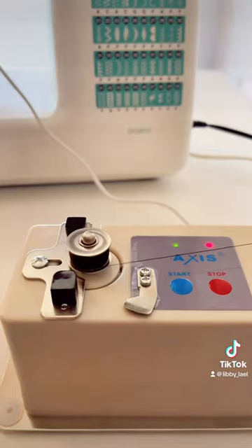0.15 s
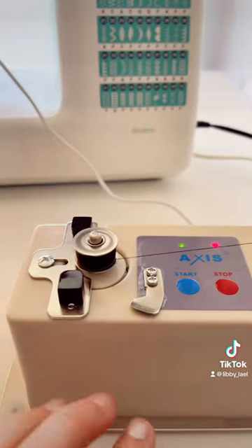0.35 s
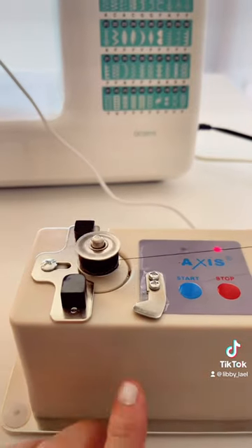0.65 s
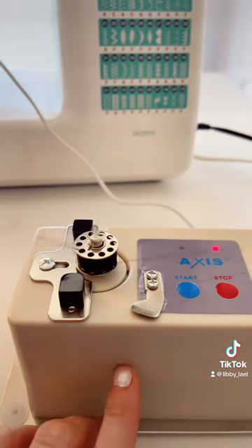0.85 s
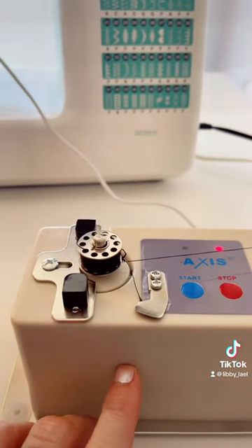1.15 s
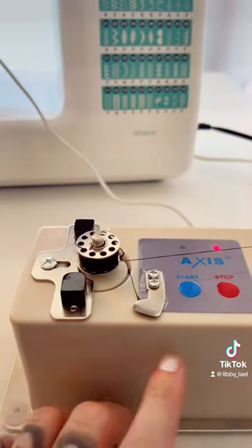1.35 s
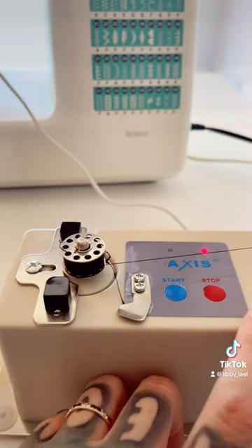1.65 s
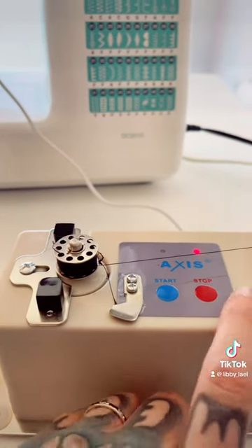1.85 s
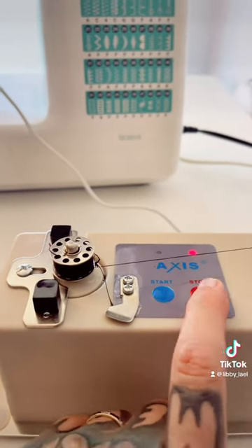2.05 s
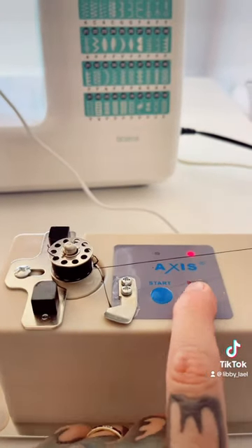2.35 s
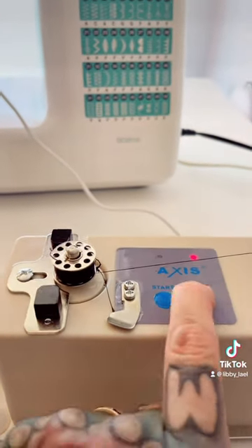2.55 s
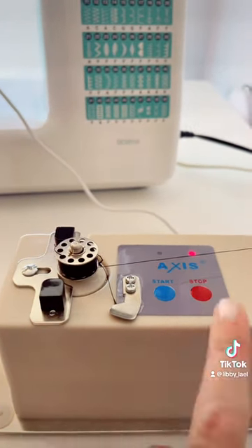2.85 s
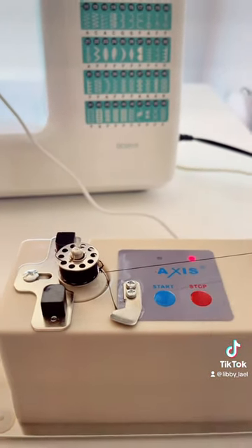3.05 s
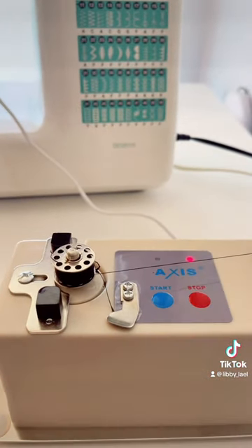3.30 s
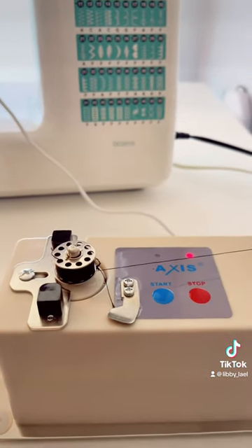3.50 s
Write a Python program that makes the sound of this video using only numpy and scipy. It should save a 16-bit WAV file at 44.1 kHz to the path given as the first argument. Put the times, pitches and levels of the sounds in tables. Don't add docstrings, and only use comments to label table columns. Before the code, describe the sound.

A small motor whirs grittily, spinning a rattling metal bobbin in a plastic box, then squeals and runs down within a second; soft hand brushing and sharp button clicks follow, close microphone in a small humming room.

```python
import sys
import numpy as np
from scipy import signal
from scipy.fft import rfft, irfft, next_fast_len
from scipy.io import wavfile
from scipy.ndimage import map_coordinates

SR = 44100
rng = np.random.default_rng(int(sys.argv[2]) if len(sys.argv) > 2 else 0)


def natural_amplitude(level_db):
    exponent = np.asarray(level_db, float) / 20
    return 10 ** exponent


def inscribe(sig):
    pcm = np.round(np.clip(np.atleast_2d(sig).T, -1, 1) * 32767)
    wavfile.write(sys.argv[1], SR, pcm.astype(np.int16))


N = 161847


def unit(x):
    return x / np.sqrt(np.mean(x ** 2) + 1e-20)


def along(points, hz):
    f, v = np.transpose(points)
    return np.interp(np.log(hz + 1), np.log(f + 1), v)


def curves(rows):
    s, *columns = np.transpose(rows)
    return [np.interp(np.arange(N) / SR, s, c) for c in columns]


def wobble(rate):
    return map_coordinates(rng.standard_normal(N // 20), [np.arange(N) * rate / SR])


def filtered(x, response):
    m = next_fast_len(N + SR // 2)
    return irfft(rfft(x, m) * response(np.fft.rfftfreq(m, 1 / SR)), m)[..., :N]


def hiss(spectrum):
    white = rng.standard_normal(N)
    return unit(filtered(white, lambda hz: natural_amplitude(along(spectrum, hz))))


def peak(f, hz, width):
    return 1j * f * width / (hz * hz - f * f + 1j * f * width)


def swell(s, length, edge):
    t = np.arange(N) / SR - s
    return np.clip(t / edge, 0, 1) * np.exp(-np.maximum(t - length, 0) / (edge + length / 3))


def ring(modes, t):
    out = 0
    for hz, db, t60 in modes:
        fading = natural_amplitude(db + rng.standard_normal() - 60 * t / t60)
        out = out + fading * np.sin(2 * np.pi * hz * t + rng.random())
    return out


def whine(rows):
    hz, db = curves(rows)
    flutter_db = 3.5 * wobble(90)
    hz = hz + 55 * wobble(120)
    return natural_amplitude(db + flutter_db) * np.sin(2 * np.pi * np.cumsum(hz) / SR)


SHAFT_HZ = 58.2
BED_DB = 1.5
GRIT_DB, TURN_DEPTH = 1, 0.03
DULLING_DB, BRIGHT_HZ, SWAY_DB = -19, 2660, 0.5
# t/s, share of full speed
SPEED = [
    (0, 1),
    (.63, 1),
    (.7, .9),
    (.76, .56),
    (.82, .35),
    (.92, .075),
    (1.05, .03),
]
# t/s, level/dB
RUN = [(0, -38.5), (.3, -39.5), (.62, -42), (.7, -42.5), (.76, -46), (.82, -56), (.92, -68), (1.05, -100)]
# f/Hz, level/dB
BEARING = [(200, -10.5), (1500, -8), (2500, -17), (5000, -16), (6500, -18.5), (10000, -20), (10700, -31),
           (16000, -33.5)]
# t/s, level/dB, length/s
RATTLES = [
    (0.037, -34, 0.0092),
    (0.059, -51, 0.002),
    (0.081, -45, 0.0041),
    (0.142, -37, 0.0036),
    (0.291, -65, 0.0031),
    (.395, -45, 0.0063),
    (0.476, -44, 0.0063),
    (.574, -52, 0.0023),
]
# f/Hz, level/dB
RATTLE = [(300, -43), (1000, 10), (2500, -1), (3600, 7.5), (5200, 2), (7300, 2), (11000, -11), (15000, -11)]
# f/Hz, level/dB, 60 dB fade/s
CHINK = [
    (7250, -39, .03),
    (3550, -46, .025),
    (5250, -46, .025),
]


def motor():
    (speed,), (db,) = curves(SPEED), curves(RUN)
    turns = 2 * np.pi * np.cumsum(SHAFT_HZ * speed) / SR
    grit = rng.standard_normal(N) * natural_amplitude(GRIT_DB * wobble(400) + wobble(26.76))
    grit = grit * (1 + TURN_DEPTH * np.cos(turns))
    bed = unit(filtered(grit, lambda f: natural_amplitude(along(BEARING, f))))
    rub = unit(case(grit) + natural_amplitude(BED_DB) * bed)
    treble = filtered(rub, lambda f: 1 / (1 + (BRIGHT_HZ / (f + 1)) ** 6))
    rub = rub - treble + treble * natural_amplitude(DULLING_DB * (1 - speed) + SWAY_DB * wobble(10.9))

    shake = sum(natural_amplitude(d) * swell(s, length, 0.00062) for s, d, length in RATTLES)
    rattle = shake * natural_amplitude(1.23 * wobble(500)) * hiss(RATTLE)
    since = np.maximum(np.arange(N) / SR - RATTLES[0][0], 0)
    chink = ring(CHINK, since) * np.minimum(1, since / 0.0031) * natural_amplitude(3 * wobble(150))
    return natural_amplitude(db) * rub + chink + rattle


DRIFT, WIDEN, FLICKER_DB = 0.018, 0.03, 1.1
# f/Hz, width/Hz, level/dB
CASE = [(538, 36, -1), (827, 234, -2.5), (1193, 12, -3), (1466, 145, -8.5), (2080, 27, -12.5),
        (3527, 120, -9), (3900, 160, -13), (4140, 80, -10.5), (4640, 40, -7), (4970, 86, -7.5),
        (5320, 210, -11), (7900, 640, -20), (9020, 81, -12.5), (10180, 28, -17)]


def case(grit):
    out = 0
    for hz, width, db in CASE:
        wide = width + WIDEN * hz
        low = filtered(grit, lambda f: peak(f, hz * (1 - DRIFT), wide) ** 2)
        high = filtered(grit, lambda f: peak(f, hz * (1 + DRIFT), wide) ** 2)
        turn = np.pi / 4 * (1 + np.tanh(wobble(8.43)))
        out = out + natural_amplitude(db + FLICKER_DB * wobble(7.67)) * (np.cos(turn) * low + np.sin(turn) * high)
    return unit(out)


# multiple of shaft pitch, level/dB
ORDERS_DB = [(4, -58), (5, -54), (6, -57.5), (9, -65), (9.5, -58), (10, -57), (11, -56), (14, -61.5),
             (20, -50), (21.6, -55.5), (25.4, -87), (27.6, -57.5), (80, -61.5)]
# t/s, level/dB
LOAD = [
    (0, 0),
    (.62, 0),
    (.65, -14),
    (.74, -24),
    (.85, -60),
]
# t/s, f/Hz, level/dB
SQUEAL = [
    (.44, 3900, -75),
    (.475, 3790, -54),
    (.52, 3600, -52),
    (.56, 3490, -50),
    (.6, 3620, -53),
    (.63, 3780, -53),
    (.655, 3500, -51),
    (.68, 3070, -58),
    (.71, 2900, -80),
]
# t/s, f/Hz, level/dB
STOP = [
    (.715, 1720, -75),
    (.733, 1650, -46),
    (.752, 1500, -46),
    (.768, 1340, -52),
    (.795, 1240, -75),
]


def tones():
    (speed,), (load_db,) = curves(SPEED), curves(LOAD)
    shaft_hz = SHAFT_HZ * speed * (1 + 0.0025 * wobble(13.1))
    turns = 2 * np.pi * np.cumsum(shaft_hz) / SR
    orders = 0
    for multiple, db in ORDERS_DB:
        strength = natural_amplitude(db + 3 + 3.7 * wobble(13.3))
        orders = orders + strength * np.sin(multiple * turns + 6 * rng.random())
    return natural_amplitude(load_db) * orders + whine(SQUEAL) + whine(STOP) + groan()


# t/s, f/Hz, level/dB
GROAN = [
    (.55, 548, -80),
    (.585, 558, -42.5),
    (.63, 560, -46),
    (.67, 545, -80),
]


def groan():
    hz, db = curves(GROAN)
    return natural_amplitude(db) * np.sin(2 * np.pi * np.cumsum(hz) / SR)


SNAP_T60_S = 0.021
TICK_DB, TICK_T60_S, HARD_S = -23.5, 0.0024, 0.00078
SOFT_S = 0.007
OFF_DB, SCUFF = 6, 0.15
# t/s,
# level/dB, snap level/dB, rise/s, strongest f/Hz
KNOCKS = [(1.273, -53, -62, 0.0019, 1140), (1.438, -44.5, -48.5, 0.0014, 824),
          (1.445, -53, -57, 0.0011, 1530), (2.411, -36.5, -60, 0.0042, 845),
          (2.496, -52, -64, 0.0012, 1000), (2.521, -34, -24.5, 0.00097, 1080),
          (2.598, -37, -70, 0.007, 860), (2.72, -55, -55, 0.0023, 1200),
          (2.7442, -28.5, -31.5, 0.0016, 1040), (2.829, -46.5, -65, 0.0023, 1530),
          (2.852, -52, -63, 0.0027, 1300), (3.059, -68, -53.5, 0.0018, 2500),
          (3.11, -60, -56, 0.0022, 1510), (1.295, -56, -80, .005, 686), (1.458, -59, -80, 0.0063, 670),
          (2.79, -50, -70, 0.0047, 955)]
# f/Hz, level/dB, 60 dB fade/s
BOX = [(675, 1, 0.1), (751, 0, 0.05), (826, 10.5, 0.024), (909, 2, 0.053), (1038, -4, 0.046),
       (1246, 7, .035), (1470, 10, 0.012), (1940, -1, 0.048), (2500, 7, 0.021), (3360, 16, 0.019)]
# f/Hz, level/dB, 60 dB fade/s
TABLE = [
    (88, 0, 0.13),
    (262, -1.5, 0.094),
]
# f/Hz, level/dB
DOME = [(300, -8), (1500, -8.5), (3500, -11), (5100, -2.5), (6200, -11), (7700, -11.5), (11000, -21),
        (16500, -31)]
# f/Hz, level/dB, 60 dB fade/s
PING = [
    (5200, -7, .011),
    (5750, -14, .008),
]
# f/Hz, level/dB
NAIL = [(1000, -16), (3000, -12), (8000, 44), (12000, 6), (16800, -17)]


def buttons():
    out, t = np.zeros(N + SR), np.arange(SR // 4) / SR
    dome, nail = hiss(DOME), hiss(NAIL)
    for k, (s, db, snap_db, rise, hz) in enumerate(KNOCKS):
        part = slice(k * SR // 5, k * SR // 5 + len(t))
        struck = []
        for f, d, t60 in BOX:
            loss_db = OFF_DB * (1 + rise / SOFT_S) * np.log2(f / hz) ** 2
            struck.append((f, d - loss_db, t60 + 4 * rise * min(1, hz / f) ** 2))
        body = ring(struck, t) * (1 + SCUFF * wobble(240)[:len(t)]) + ring(TABLE, t)
        knock = natural_amplitude(db) * body * (1 - np.exp(-t / rise))
        tick = natural_amplitude(db + TICK_DB - 60 * t / TICK_T60_S) * nail[part] * (HARD_S / rise) ** 2
        snap = natural_amplitude(-60 * t / SNAP_T60_S) * dome[part] + natural_amplitude(snap_db - db) * ring(PING, t)
        snap = natural_amplitude(snap_db) * snap * np.minimum(1, 3 * t / rise)
        out[round(s * SR):][:len(t)] += knock + tick + snap
    return out[:N]


# t/s, level/dB, 60 dB fade/s
TICKS = [(1.272, -55, 0.028), (1.4375, -52, 0.011), (1.447, -46, 0.023), (1.543, -64, .02),
         (1.765, -68, .01), (1.803, -75, 0.018), (2.5205, -71, 0.0048), (2.531, -35, 0.011),
         (2.722, -60, .015), (2.7454, -29, 0.018), (2.755, -39, .012), (2.817, -66, .01),
         (2.831, -58, .015), (2.850, -64, 0.019), (3.062, -58, .015), (3.111, -56, .02)]
# f/Hz, level/dB
CRISP = [(500, -12), (1500, 16), (4000, -17), (8000, -1), (11000, -9.5), (14000, -18), (16900, -8)]


def ticks():
    t = np.arange(N) / SR
    fades = sum(natural_amplitude(db - 60 * np.maximum(t - s, 0) / t60) * (t > s) for s, db, t60 in TICKS)
    return fades * hiss(CRISP)


# t/s, length/s, level/dB
BRUSHES = [(1.24, 0.14, -69.5), (1.42, 0.19, -68.5), (1.723, 0.11, -70.5), (1.798, 0.033, -65),
           (2.703, 0.023, -61), (2.766, 0.079, -59.5), (2.911, 0.21, -70.5), (3.04, 0.07, -65.5),
           (3.094, 0.1, -83), (3.16, 0.15, -78), (1.525, .1, -77)]
# f/Hz, level/dB
SKIN = [(300, -18), (800, -4), (2000, 9.5), (3700, 5.5), (4800, -2), (7500, -1), (11500, -12),
        (15000, -10.5)]


def hand():
    stroke = sum(natural_amplitude(d) * swell(s, length, 0.024) for s, length, d in BRUSHES)
    grain_db = wobble(40) + 1.6 * wobble(300)
    return stroke * natural_amplitude(grain_db) * hiss(SKIN)


# t/s, level/dB
SLEEVE = [
    (1.2, -100),
    (1.26, -74),
    (1.65, -77),
    (1.72, -100),
    (3.03, -100),
    (3.12, -66.5),
    (3.29, -73),
    (3.33, -100),
]
# f/Hz, level/dB
CLOTH = [(3000, -28), (6000, -2), (8000, 0), (11500, -10), (15000, -8)]


def sleeve():
    db, = curves(SLEEVE)
    return natural_amplitude(db + wobble(29.8)) * hiss(CLOTH)


AIR_DB, RUMBLE_DB, FAN_SWAY_DB = -61, -48, 1.2
# f/Hz, level/dB
HUM = [
    (120, -41.5),
    (240, -62),
]
# f/Hz, width/Hz, level/dB
FAN = [
    (38.5, 43, -49),
    (253.7, 46.5, -58),
    (1607, 160, -66),
]
# f/Hz, level/dB
RUMBLE = [(27, -50), (37, 6), (45, 5), (90, -2.5), (170, -3.5), (260, -9), (400, -16.5), (600, -55.5)]
# f/Hz, level/dB
AIR = [(200, -15.5), (400, 1), (700, -6.5), (1300, -11.5), (2500, -18), (5000, -27), (9000, -38.5),
       (15700, -51)]


def background():
    t = np.arange(N) / SR
    out = natural_amplitude(RUMBLE_DB) * hiss(RUMBLE) + natural_amplitude(AIR_DB + 0.1 * wobble(3.84)) * hiss(AIR)
    for hz, db in HUM:
        strength = natural_amplitude(db + 2 + 0.31 * wobble(3.1))
        out = out + strength * np.sin(2 * np.pi * hz * t + 0.051 * wobble(7.8))
    for hz, width, db in FAN:
        drone = unit(filtered(rng.standard_normal(N), lambda f: peak(f, hz, width) ** 2))
        out = out + natural_amplitude(db + FAN_SWAY_DB * wobble(10)) * drone
    return out


# f/Hz, 60 dB fade/s
ROOM = [(300, 0.6), (2000, 0.54), (6000, 0.45), (12000, 0.49)]


def room(x, rate):
    hz, t, z = signal.stft(rng.standard_normal((2, SR // 2)), SR, nperseg=256)
    fade = natural_amplitude(-60 * t / along(ROOM, hz)[:, None])
    tail = signal.istft(z * fade, SR, nperseg=256)[1]
    tail = tail / np.linalg.norm(tail[0])
    late = np.pad(x, (200, 0))[None]
    a, b = signal.fftconvolve(late, tail, axes=1)[:, :N]
    turn = 2 * wobble(rate)
    return np.cos(turn) * a + np.sin(turn) * b


ROOM_DB, CLICK_ROOM_DB = -10.5, -9.5
TOP_HZ, EDGE_HZ, LEAK_DB = 15750, 16950, -9


def scene():
    near, clicks = motor(), buttons() + ticks()
    echoes = natural_amplitude(ROOM_DB) * room(near, 40) + natural_amplitude(CLICK_ROOM_DB) * room(clicks, 220)
    steady = near + tones() + echoes + hand() + sleeve() + background()
    steady = filtered(steady, lambda hz: hz < TOP_HZ)
    clicks = filtered(clicks, lambda hz: np.where(hz < TOP_HZ, 1, natural_amplitude(LEAK_DB) * (hz < EDGE_HZ)))
    return (steady + clicks)[None]


def top_cut(x):
    return signal.sosfilt(signal.butter(12, 16990, fs=SR, output="sos"), x)


def record(dry):
    mix = filtered(dry, lambda hz: 1 / np.sqrt(1 + (38 / (hz + 1)) ** 8))
    return top_cut(mix)


dry = scene()
out = record(dry)
inscribe(out)
```